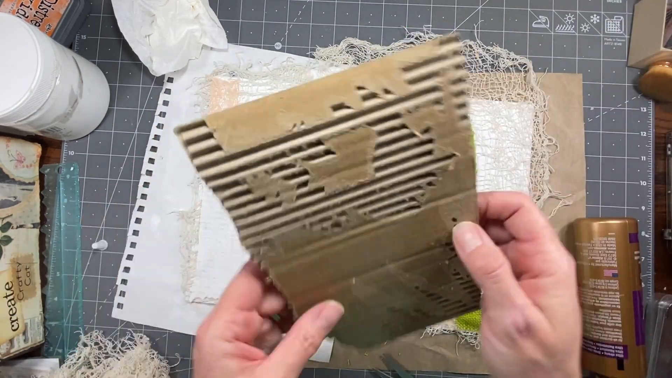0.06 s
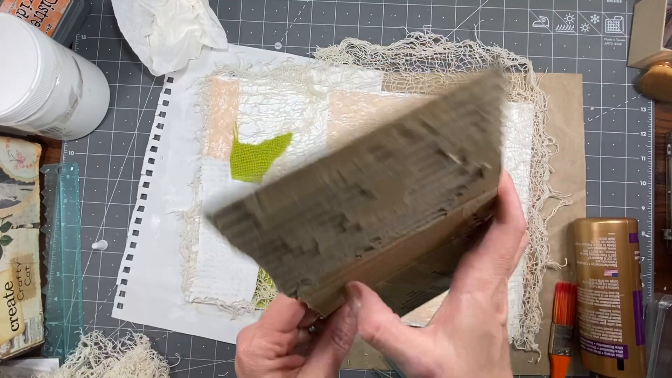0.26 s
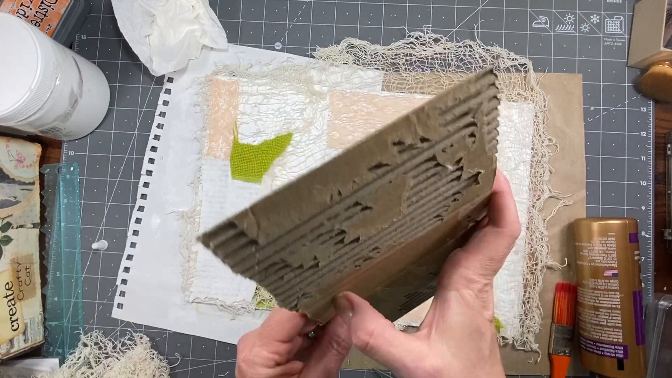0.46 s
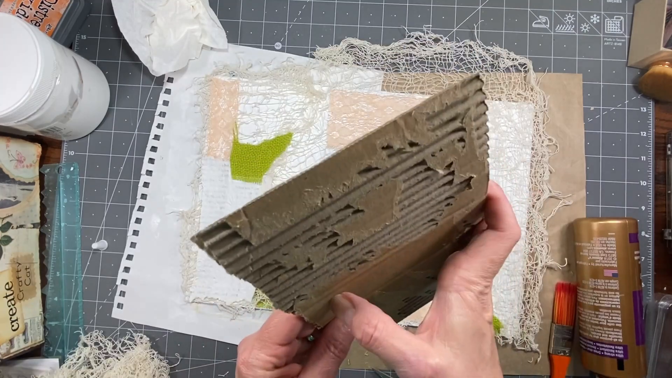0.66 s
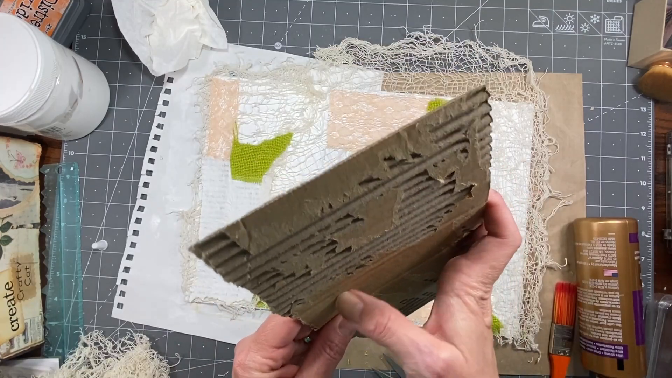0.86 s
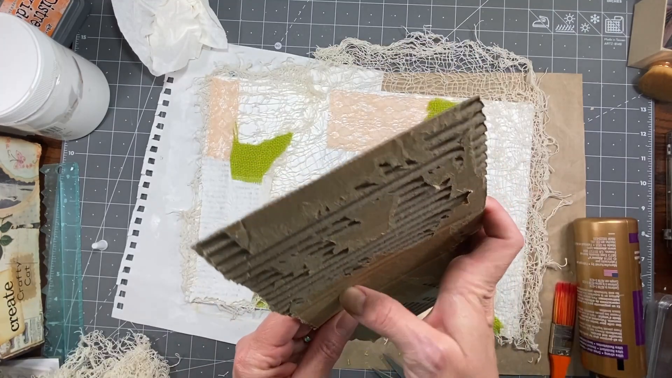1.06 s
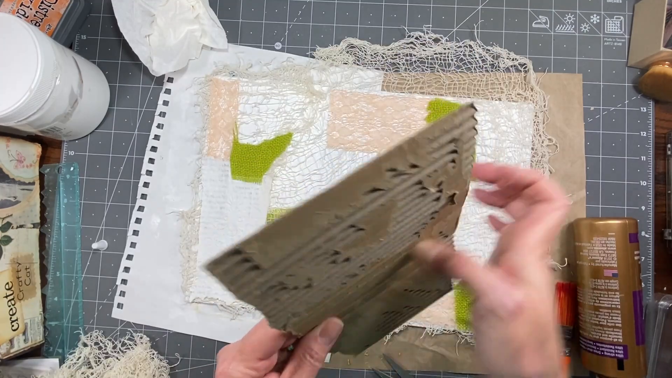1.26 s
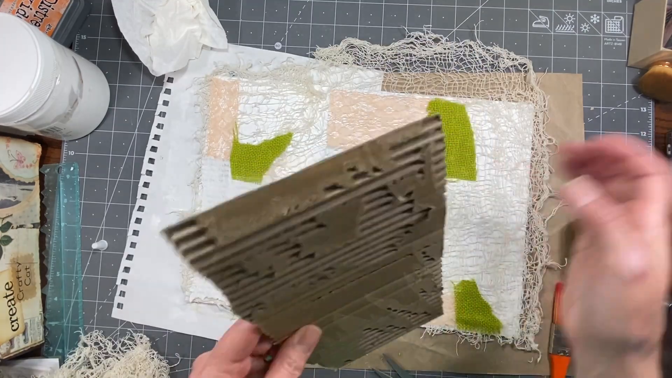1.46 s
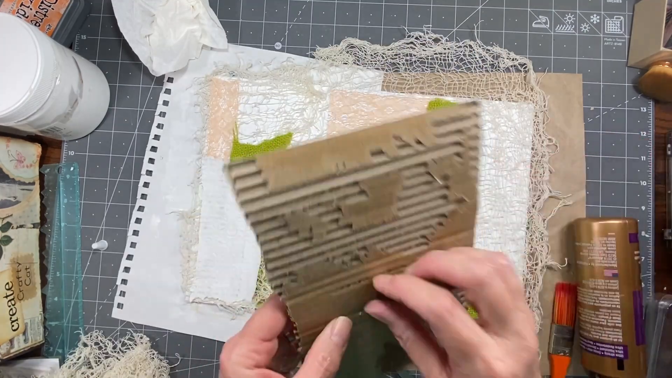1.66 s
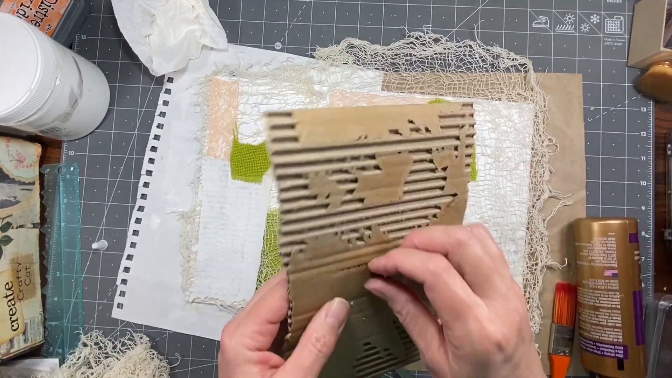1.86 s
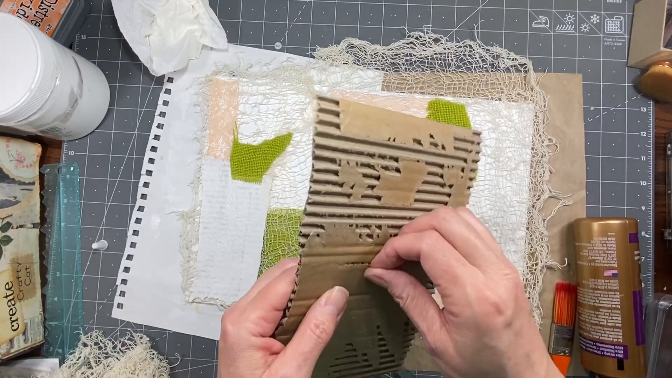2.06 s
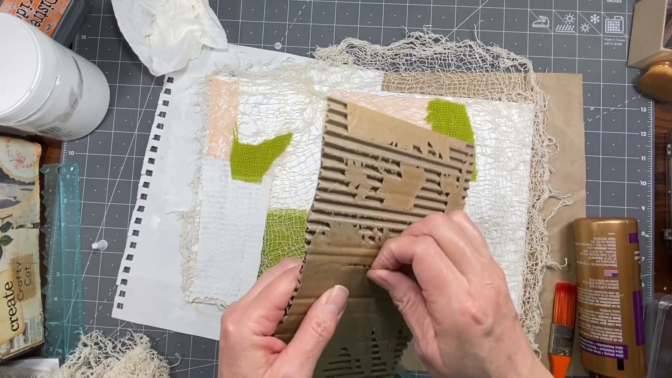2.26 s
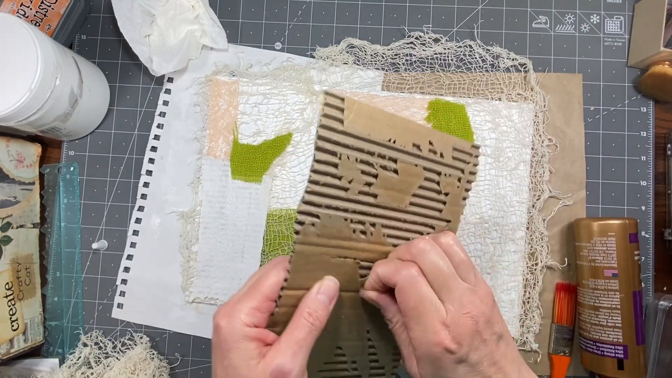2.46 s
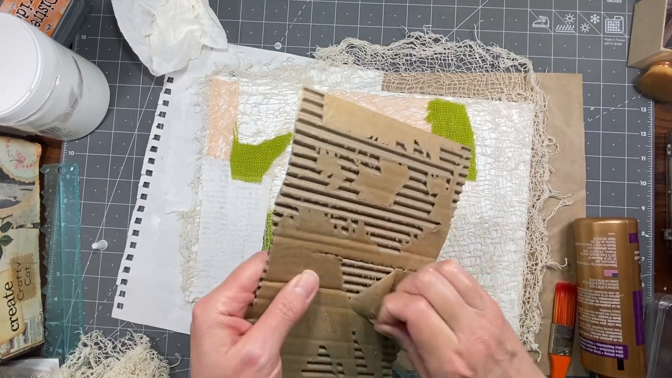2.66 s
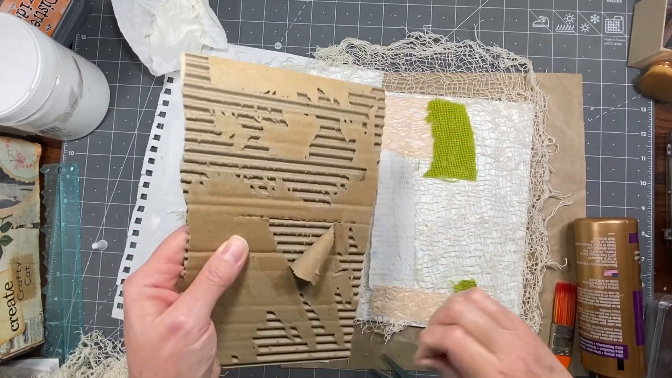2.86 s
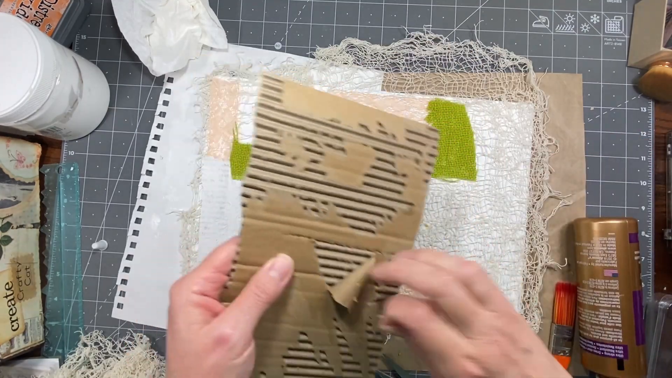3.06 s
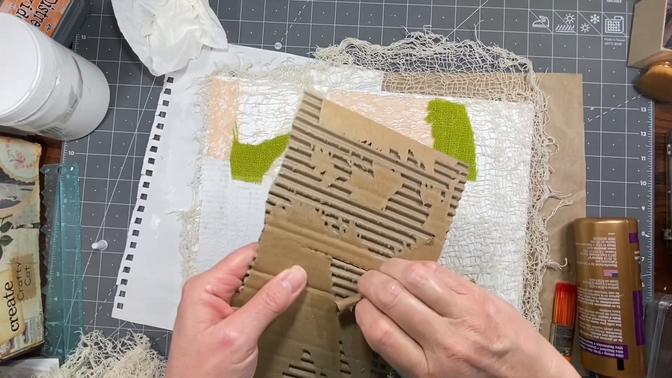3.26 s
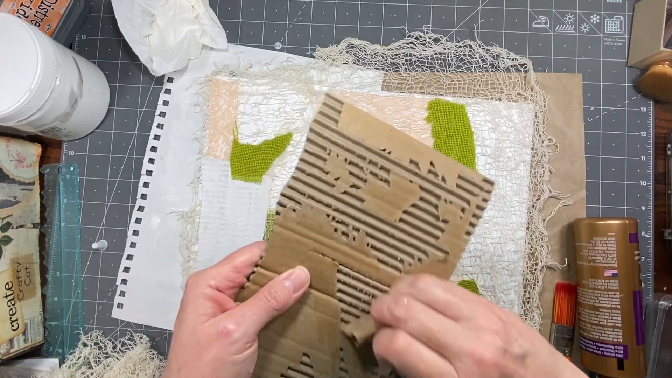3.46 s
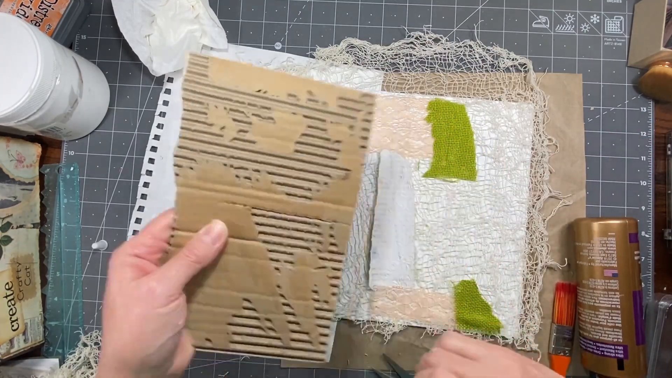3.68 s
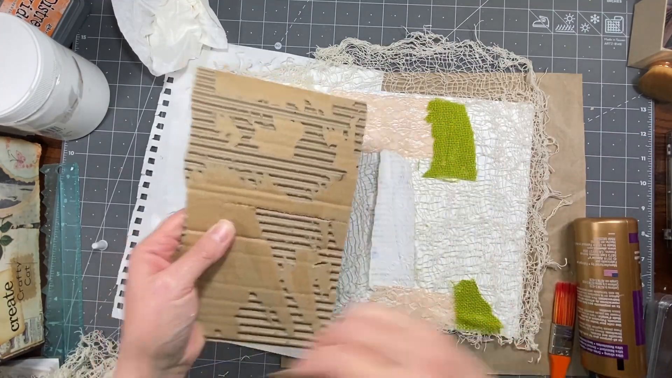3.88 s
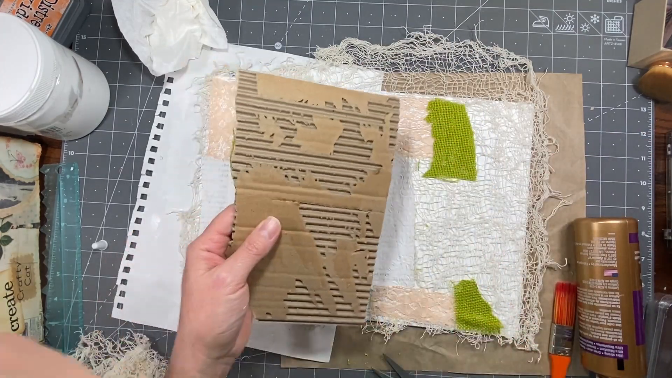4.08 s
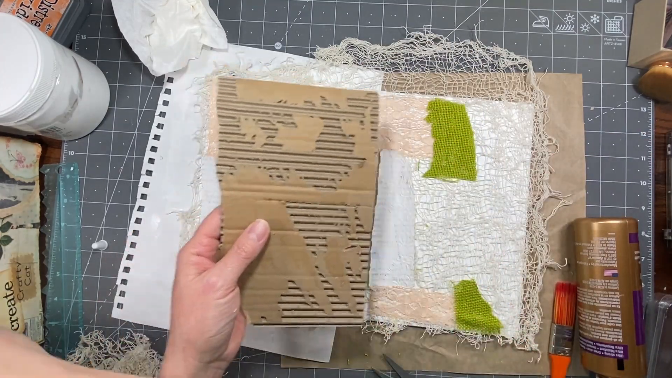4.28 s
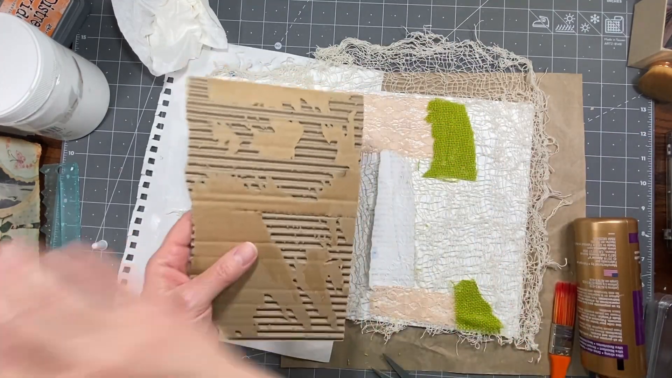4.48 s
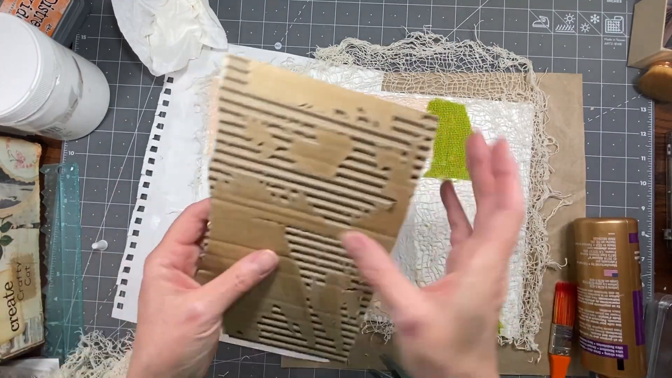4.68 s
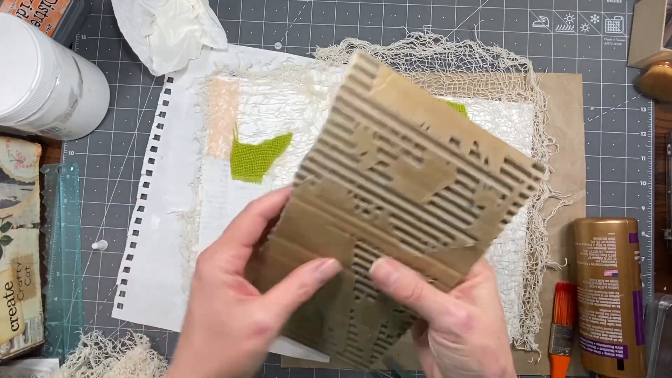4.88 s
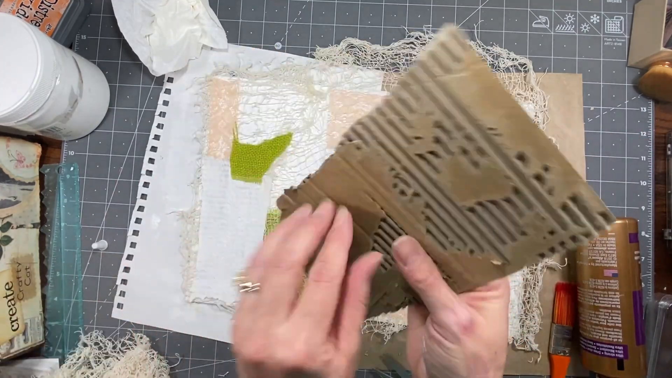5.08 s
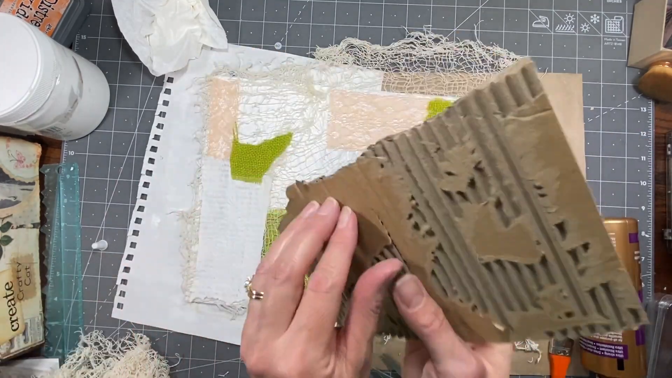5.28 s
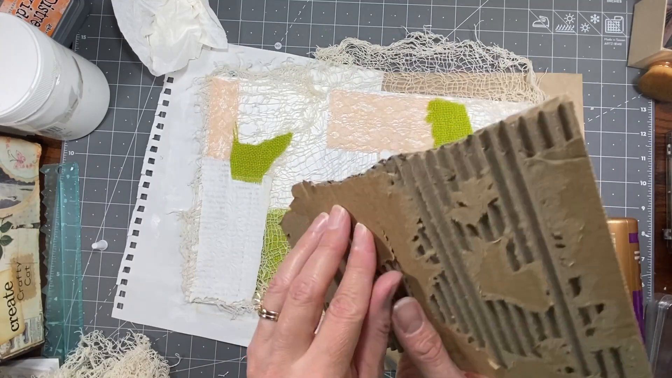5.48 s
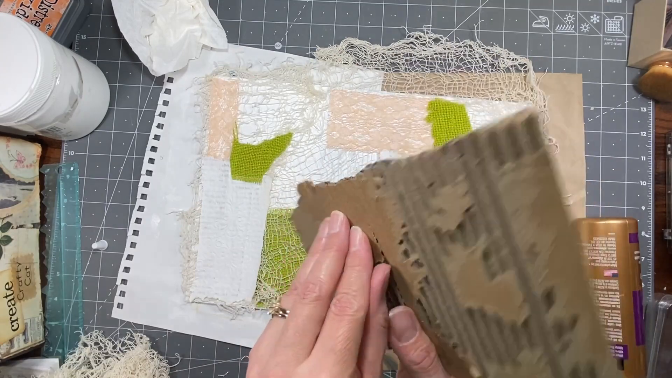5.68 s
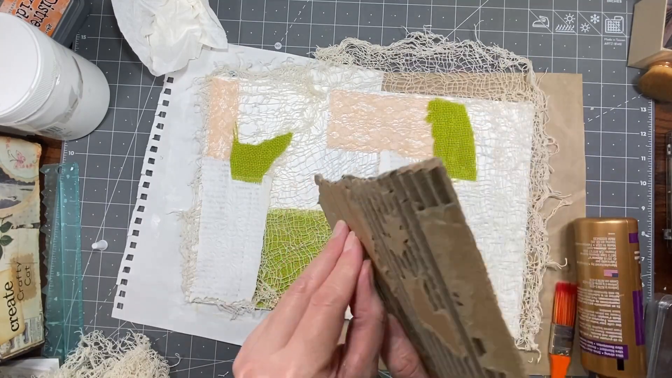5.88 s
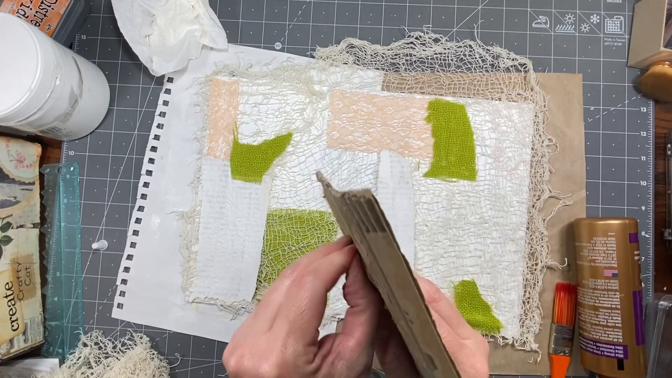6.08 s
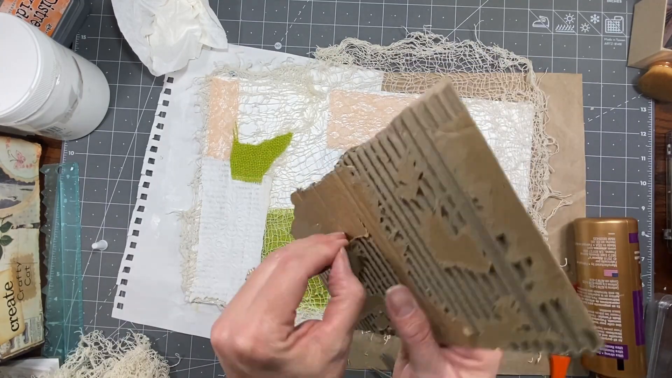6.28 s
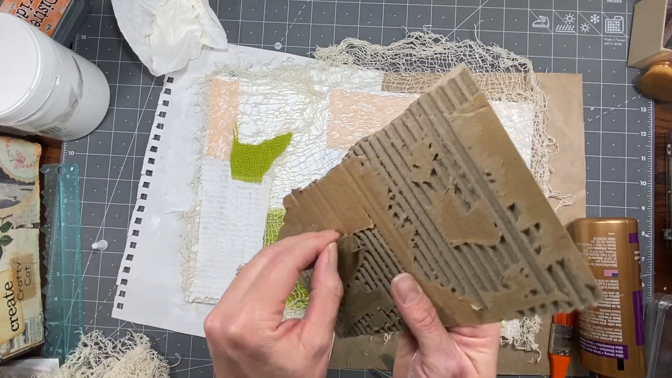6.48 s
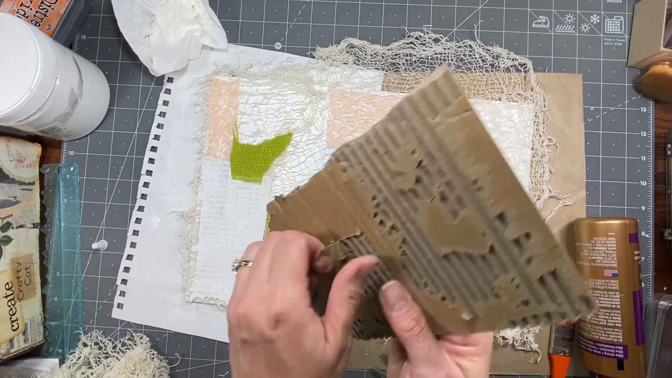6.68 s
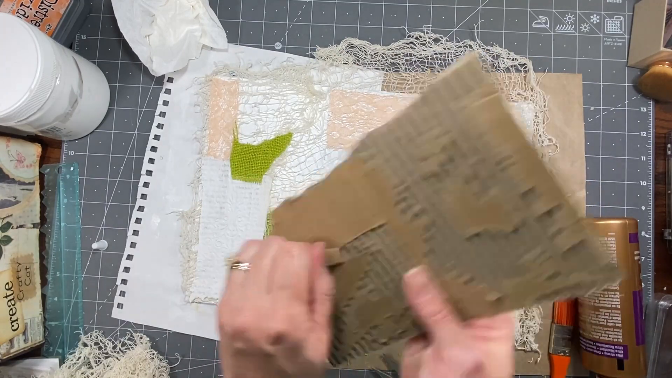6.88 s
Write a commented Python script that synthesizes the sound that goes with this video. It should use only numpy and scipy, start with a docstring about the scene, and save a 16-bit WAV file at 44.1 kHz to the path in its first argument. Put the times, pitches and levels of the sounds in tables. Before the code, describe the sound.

In a small, quiet room, fingers rub and scratch at corrugated cardboard, then tear its paper layer away in three short bouts of dry crackling and snapping. A softer stretch follows as the board is turned over, with light hollow taps and low bumps, before two more quick rips. The microphone is above the table and picks up a faint background and a very brief room reflection.

```python
"""A craft table in a small room: hands turn a piece of corrugated board over, pick at its paper facing
and peel it off in short rips. Fibres snap in dense clumps, crackle and shake the board; glue joints
crack. Fingertips knock on the hollow flutes; the held sheet trembles and thumps at grips and releases.
The room answers briefly. Heard from above through two microphone ports, over room tone."""
import sys
import numpy as np
from scipy import signal
from scipy.fft import rfft, irfft, next_fast_len
from scipy.io import wavfile
from scipy.ndimage import uniform_filter1d, map_coordinates

SR = 44100
rng = np.random.default_rng(int(sys.argv[2]) if len(sys.argv) > 2 else 0)


def pcm_store(signal):
    """Save signal as 16-bit PCM."""
    levels = np.round(np.clip(np.atleast_2d(signal), -1, 1) * 32767)
    wavfile.write(sys.argv[1], SR, levels.astype(np.int16).T)


N = 306054

# room tone spectrum: (frequency [Hz], density [dB])
ROOM_TONE = [(15, -42), (25, -5), (82, -6.5), (267, -22.5), (434, -16.5), (807, -34), (923, -26.5),
             (7140, -35), (7960, -34), (13300, -32.5), (15600, -38.5)]
# fingers rubbing and picking: (start [s], length [s], board level [dB], swell start to end [dB],
# crackle over board [dB], flex over board [dB], favoured pitch [Hz])
RUBS = [(0, 0.046, -70, -3, 4, -23, 1900), (0.06, 0.042, -50, -2, 6.5, -4.5, 1430),
        (0.128, 0.037, -67, -8, 3.5, -8, 1650), (0.181, 0.056, -46.5, 2.5, 2.5, -12.5, 2200),
        (0.258, 0.062, -52, 4.5, 3, -3.5, 1870), (0.335, 0.1, -58, 4, -4.5, -6.5, 1860),
        (0.457, 0.245, -69.5, -6.5, -13, -2, 1590), (0.562, 0.022, -68, -3, 3.5, 0, 1560),
        (.698, 0.029, -60, -7, 1.5, -4, 1080), (.735, 0.056, -75, -4, 0, -3, 1400),
        (0.827, 0.051, -63, 3, 9, 0, 2620), (0.942, 0.053, -60, -13.5, 9, 10, 1400),
        (1.016, 0.041, -69.5, -2, 12, 2.5, 1680), (1.489, 0.043, -75, 2, 12.5, -16.5, 1700),
        (1.54, 0.044, -65, -1, 9.5, -15, 1100), (1.617, 0.03, -45, -3.5, 2, -2, 960),
        (1.65, 0.11, -57, -12, 3, -3.5, 1390), (1.73, 0.14, -53, -13, 0, -13, 1590),
        (1.866, 0.035, -53, 0, 2.5, -12, 1540), (1.925, 0.068, -57.5, -12, 4.5, -13.5, 2670),
        (1.989, 0.16, -61, -10.5, 3.5, -13, 2620), (2.104, 0.092, -55, -16.5, -1, -14, 3130),
        (2.198, 0.05, -65, 8, 1, -12, 1250), (2.248, 0.13, -57.5, -7, 4.5, -13, 1210),
        (3.106, 0.067, -48, 2, -4, -11.5, 1860), (3.153, 0.078, -44, 2.5, 2, -13, 1860),
        (3.24, .045, -52, 3, -2, -9, 1840), (3.294, .02, -46.5, -1.5, 2, -7, 1860),
        (3.31, 0.036, -52.5, 0, -4.5, -8, 1860), (3.363, 0.048, -43.5, -6, 1.5, -13.5, 1860),
        (3.866, 0.037, -76.5, 5, 12.5, -8.5, 1200), (3.915, 0.083, -61.5, -1, 4, -3, 915),
        (3.977, 0.14, -59.5, -8.5, 3, -6, 1020), (4.142, .026, -70.5, -1.5, 22.5, -29, 2540),
        (4.187, .09, -73, -7, 6, -13, 1800), (4.28, 0.042, -64.5, -7, 5, -3, 1102),
        (4.36, 0.036, -65.5, -1, 4, -12, 1096), (4.426, 0.051, -66, 1, 4, -7, 2200),
        (4.494, 0.15, -59, -5.5, 3, -9.5, 1140), (4.661, 0.063, -75, -5, 5, -11.5, 1500),
        (4.741, 0.07, -67, 10.5, 2.5, -11, 2590), (4.79, 0.12, -56, -2.5, 3, -14, 1100),
        (4.876, 0.041, -44.5, 3, 3, -9, 1520), (4.918, .076, -53, 5, 2.5, -12, 1510),
        (5.004, 0.091, -63.5, -9, -1, -4, 1860), (5.113, .145, -58.5, -0.5, 6.5, -10, 1170),
        (5.254, 0.027, -46, -5, -2, -14, 1520), (5.298, 0.038, -43.5, -8, -8, -9.5, 1840),
        (5.342, 0.046, -55, 12, 1.5, -12, 1110), (5.388, 0.038, -48.5, -4, -0.5, -14, 3100),
        (5.453, 0.15, -64, -21.5, 1, -14.5, 2230), (5.581, 0.069, -53, 3.5, 3.5, -26, 2380),
        (5.679, 0.079, -54, -2, 3.5, -11.5, 2700), (5.77, 0.09, -57, 8, 2, -14, 2220),
        (5.871, 0.063, -54, -11, -0.5, -12, 785), (5.93, 0.059, -45.5, -1, 2, -18.5, 1960),
        (6.001, 0.1, -53.5, 6, 10.5, -32, 800), (6.12, 0.053, -57.5, 14, 11.5, -30, 2580),
        (6.187, .11, -43, 0.5, 7.5, -17, 2210), (6.402, 0.066, -66.5, 8, -1, -12, 1100),
        (6.457, .092, -54, 1, -5.5, -7, 1730), (6.695, .045, -58.5, 3, 5.5, -13.5, 1600),
        (6.743, 0.048, -43.5, -3, 1.5, -10.5, 1900)]
# facing tearing off, one list a rip:
# (time [s], board level [dB], crackle over board [dB], flex over board [dB], favoured pitch [Hz])
RIPS = [
    [(1.088, -40.5, 6.5, -9.5, 2220), (1.148, -38, 2, -2.5, 1470), (1.212, -26.5, 4, -12.5, 1202),
     (1.266, -26, 2.5, -13, 1153), (1.28, -18.5, 9, -16, 1340), (1.3, -38.5, 2.5, 4.5, 1320)],
    [(2.357, -45.5, 10.5, -6, 3020), (2.38, -34, 4.5, -14.5, 2840), (2.428, -45.5, 14.5, -3, 2020),
     (2.46, -48, 14.5, -14, 2770), (2.52, -47, 4.5, -15, 2580)],
    [(2.53, -33.5, 6.5, -18, 2700), (2.582, -36.5, 8, -11, 1550), (2.632, -39, 6, -10, 2900),
     (2.668, -40.5, 12.5, -11, 1380), (2.698, -35.5, 8.5, -20, 1390), (2.702, -16, -17.5, -20, 1260),
     (2.712, -24.5, -4.5, -16, 1400), (2.722, -45, -8.5, -4, 1470)],
    [(3.413, -32, 3, -10, 1810), (3.443, -27.5, 4.5, -14, 1990), (3.505, -32, 7.5, -7, 2200),
     (3.567, -24.5, 6.5, -8, 1600), (3.597, -40, 5.5, -9.5, 1763), (3.63, -41.5, 9.5, -6, 1240)],
    [(6.31, -37.5, 1.5, -12, 2070), (6.346, -33, 8.5, -11, 1880), (6.39, -50, 3.5, -10, 1880)],
    [(6.815, -49, 5, -15, 1900), (6.84, -39, 4.5, -14, 1860), (6.863, -27.5, 5.5, -15.5, 2120),
     (6.923, -28, 2, -8.5, 1630), (6.94, -49.5, 8, -4, 1800)],
]
# glue joints letting go: (time [s], board level [dB], crackle over board [dB], flex over board [dB])
GLUE_SNAPS = [(0.0539, -34.5, 18.5, -5), (.0998, -25, -16, -3), (0.2215, -23.5, -5, -7),
              (.2813, -35, 14, -3), (0.7008, -43, 4, -12), (0.951, -9, 7, -5), (.968, -31.5, 12, -14),
              (1.0854, -18, 4.5, -1.5), (1.246, -6.5, 1, -14), (1.2763, -6, -2, -5),
              (1.6146, -32, -2.5, 7.5), (1.6272, -21.5, 2.5, -9), (1.6404, -12.5, -24, -6),
              (1.728, -31.5, -14, 2), (1.9275, -43, 7, -25), (2.03, -31.5, 3.5, -25), (2.1077, -50, 6, -15),
              (2.2503, -34, 13, -32), (2.355, -15, -5, -8.5), (2.3753, -12.5, 2, -34),
              (2.4049, -19, 15, -14), (2.528, -19.5, -2, -6.5), (2.6799, -14.5, -2, -2.5),
              (2.7005, -6, -20, -2), (2.71, -19, 4.5, -20), (3.1053, -29.5, -15, 5),
              (3.129, -24.5, -6.5, -18), (3.2223, -36, 4, 7), (3.299, -24, 1, -11), (3.3397, -20, -22, -7),
              (3.3588, -34, 8, -19), (3.403, -14, -12, -19), (3.4136, -23, 9, -19), (3.4548, -9, 0, -17),
              (3.6197, -16.5, -5, -3), (3.9717, -30, -3, 1.5), (4.2795, -38.5, -1.5, -17),
              (4.4315, -51, 13, -13), (4.4992, -45.5, 5.5, 7), (4.8944, -20.5, -11.5, 1),
              (4.912, -37, -2, -13), (5.0414, -37, 3, -15), (5.1077, -24, -1.5, 1.5),
              (5.2556, -30, -16, -3), (5.3005, -26, -22, -12), (5.3288, -31, -10, -10),
              (5.6095, -38.5, 18, -29), (5.9303, -42, 1, -14), (6.0912, -31, 17, -32),
              (6.186, -13.5, -16, -43), (6.2074, -22, 13.5, -26), (6.223, -26.5, 21.5, -32),
              (6.24, -13, 10.5, -25), (6.2567, -23, 2, -14), (6.31, -22, 9, -16), (6.467, -36, 0, -20),
              (6.5301, -27.5, -14, -9), (6.5927, -43, 10, -28), (6.746, -24, -1, -13),
              (6.77, -11.5, -10, -18), (6.8145, -23.5, 8, -23), (6.8484, -13, -1, -27),
              (6.8756, -9, 7.5, -18.5)]
# fingertips on the flutes: (time [s], level [dB], pitch [Hz])
KNOCKS = [(.059, -35, 187), (.21, -36, 220), (.236, -33.5, 391), (.952, -34.5, 393), (.957, -32, 209),
          (1.293, -17, 375), (1.299, -27.5, 188), (1.638, -28.5, 370), (2.714, -47.5, 413),
          (3.104, -39, 448), (3.224, -33.5, 420), (3.618, -32.5, 424), (3.974, -47, 339),
          (4.892, -33.5, 163), (5.107, -30.5, 213), (5.3, -47, 323), (5.697, -52.5, 200),
          (6.69, -38.5, 292), (6.768, -38.5, 399)]
# grips and releases: (time [s], level [dB], pitch [Hz])
THUMPS = [(.068, -37, 69.4), (.105, -37, 78), (.242, -41, 89.9), (.299, -50, 74), (.954, -41.5, 97.2),
          (1.136, -61, 101.5), (1.207, -41.5, 104.6), (1.296, -34.5, 68.7), (1.651, -34.5, 79.7),
          (1.759, -51, 67.9), (2.405, -54.5, 72.3), (2.578, -48, 75), (2.706, -40, 80.6),
          (3.117, -42, 77.3), (3.465, -69.5, 54), (3.527, -52, 94), (3.58, -48.5, 73), (4.913, -34.5, 65.8),
          (5.12, -40, 66.3), (5.321, -46, 70.3), (5.692, -58.5, 88), (6.241, -48, 60), (6.352, -53.5, 88.4),
          (6.526, -58.5, 70.6), (6.696, -46, 89.6), (6.869, -41, 86)]
# resonances of board ringing, board flexing, whole sheet flapping: (frequency [Hz], width [Hz], gain [dB])
BOARD_MODES = [(783, 100, -5), (975, 120, 0.5), (1117, 130, -5.5), (1476, 300, -2.5), (1870, 212, -2.5),
               (2323, 440, -2), (2583, 110, -4.5), (2910, 500, 2), (4000, 3600, 4.5)]
FLEX_MODES = [(165, 20, -6), (261, 58, -4), (407, 48, 3), (590, 120, -1)]
SHEET_MODES = [(70, 44, 0)]
# fibre crackle spectrum: (frequency [Hz], density [dB])
CRACKLE_SPECTRUM = [(2500, -18.5), (4500, -6.5), (5500, -4.5), (7500, -0.5), (11000, -4.5), (13500, -1.5),
                    (15600, -7.5)]
# room decay: (frequency [Hz], T60 [s])
ROOM_DECAY = [(150, 0.1), (1500, 0.24), (6000, 0.25), (15000, 0.2)]
# between the ports: (frequency [Hz], left lead [rad], likeness [0-1], left over right [dB])
PORTS = [(60, .1, .98, 0), (150, 0, .95, 1.5), (350, -.3, .8, 4), (600, -.8, .7, 3.5), (1100, -.8, .65, 0),
         (1800, 0, .95, -1), (2600, .6, .5, -4), (3800, .3, .7, -2.5), (4700, .7, .45, -2.5),
         (5900, 1.3, .6, -.5), (6800, 2.9, .97, 0), (7800, 3.4, .97, 0), (8700, 4.5, .65, 0),
         (9800, 6.15, .99, 0), (10900, 6.4, .99, 0), (11900, 7.5, .5, 0), (12800, 9.3, .99, 0),
         (14300, 9.55, .99, 0), (15000, 10.8, .5, 0), (15800, 12.4, .8, 0)]
# microphone response: (frequency [Hz], gain [dB])
MIC_RESPONSE = [(25, -8), (50, 0), (15750, 0), (15950, -36)]

STROKE_ATTACK_DB_PER_S, STROKE_RELEASE_DB_PER_S = 2199.5, 899.5
BURST_DB, BURST_T60_S, BURST_RISE_S = -11.5, 0.019, 0.00046
ROOM_TONE_DB, REVERB_DB = -73, -20.0
BAND_LIMIT_HZ = 17140


def amp(db):
    """Level to gain."""
    return 10 ** (np.asarray(db) / 20)


def unit_rms(x):
    """x at rms 1."""
    return x / np.sqrt(np.mean(x ** 2) + 1e-20)


def lookup(table, hz, column=1):
    """Table column interpolated over log frequency."""
    points = np.array(table, float)
    return np.interp(np.log(hz + 1), np.log(points[:, 0] + 1), points[:, column])


def wobble(knots_per_s):
    """Smooth random curve."""
    knots = rng.standard_normal(int(N * knots_per_s / SR) + 4)
    return map_coordinates(knots, [np.arange(N) * knots_per_s / SR])


def filtered(x, response):
    """x through a complex frequency response."""
    size = next_fast_len(N + SR // 2)
    return irfft(rfft(x, size) * response(np.fft.rfftfreq(size, 1 / SR)), size)[..., :N]


def drive(force, response):
    """Force through a response scaled so white noise keeps its rms."""
    hz = np.linspace(0, SR / 2, 4096)
    return filtered(force, response) / np.sqrt(np.mean(np.abs(response(hz)) ** 2))


def modes(table):
    """Causal response of resonances, alternating in sign."""
    return lambda hz: sum((-1) ** k * amp(db) * 1j * hz * width / (centre**2 - hz**2 + 1j * hz * width)
                          for k, (centre, width, db) in enumerate(table))


def room_tone():
    """Unsteady background: bass common to both ports, the rest unrelated."""
    noise = filtered(rng.standard_normal((3, N)), lambda hz: amp(lookup(ROOM_TONE, hz)))
    bass_share = lambda hz: 1 / (1 + (hz / 180) ** 4)
    common = filtered(noise[0], lambda hz: np.sqrt(bass_share(hz)))
    separate = filtered(noise[1:], lambda hz: np.sqrt(1 - bass_share(hz)))
    return amp(ROOM_TONE_DB + 2.1 * wobble(27.0)) * unit_rms(common + separate)


def hand_strokes():
    """Rubs and rips: strength on (board, crackle, flex) and power-weighted favoured pitch."""
    rubs = [[(start_s, db - swell_db / 2, *colour), (start_s + length_s, db + swell_db / 2, *colour)]
            for start_s, length_s, db, swell_db, *colour in RUBS]
    t, centre_hz = np.arange(N) / SR, 1600
    power, weighted_octaves = np.full((3, N), 1e-10), np.zeros(N)
    for stroke in rubs + RIPS:
        times_s, board_db, crackle_db, flex_db, hz = np.transpose(stroke)
        edge_db = STROKE_ATTACK_DB_PER_S * np.minimum(t - times_s[0], 0)
        edge_db += STROKE_RELEASE_DB_PER_S * np.minimum(times_s[-1] - t, 0)
        active = edge_db > -70
        levels_db = board_db, board_db + crackle_db, board_db + flex_db
        stroke_power = amp([np.interp(t[active], times_s, db) + edge_db[active] for db in levels_db]) ** 2
        power[:, active] += stroke_power
        weighted_octaves[active] += stroke_power[0] * np.interp(t[active], times_s, np.log2(hz / centre_hz))
    return np.sqrt(power), np.log2(centre_hz) + weighted_octaves / power[0]


def fibres(per_s, spread_db, clump_db):
    """Fibres breaking in clumps, random in time and size; rms 1."""
    breaks = rng.random(N) < per_s / SR
    size = amp(spread_db * rng.exponential(size=N)) * rng.standard_normal(N)
    clumps = amp(clump_db * (wobble(45) + 0.37 * wobble(170)))
    return unit_rms(breaks * size * clumps)


def cardboard(forces, strength, favoured_log2_hz):
    """Board rings, flexes, crackles; the shifting grip damps modes away from the favoured pitch."""
    board_force, crackle_force, flex_force = forces
    brightness_db = np.clip(20 * np.log10(strength[1] / strength[0]), -15, 15)
    boost_db = 11 - 0.44 * brightness_db  # dull strokes ring more
    nearness = lambda hz: np.exp(-((np.log2(hz) - favoured_log2_hz) / 0.21) ** 2)
    gains = [amp(db + boost_db * nearness(hz) + 2.3 * wobble(12)) for hz, _, db in BOARD_MODES]
    shares = gains / np.sqrt(np.sum(np.square(gains), axis=0))
    sides = np.sign(rng.standard_normal(shares.shape))  # each fibre's side of a mode's node lines
    ringing = sum(share * drive(side * board_force, modes([(hz, width_hz, 0)]))
                  for side, share, (hz, width_hz, _) in zip(sides, shares, BOARD_MODES))
    flexing = drive(flex_force, modes(FLEX_MODES))
    crackle = drive(crackle_force, lambda hz: amp(lookup(CRACKLE_SPECTRUM, hz)))
    bending_delay = lambda hz: np.exp(-2j * np.pi * 0.2042 * (np.sqrt(hz) - hz / 150))  # lows come late
    return filtered(ringing + flexing, bending_delay) + crackle


def sheet_rumble(flex_strength):
    """The held sheet trembles, more as the hands work harder."""
    effort = uniform_filter1d(flex_strength, size=1500)
    level = effort ** 0.44 * amp(-38.5 + 3.1 * wobble(10))
    return drive(level * rng.standard_normal(N), lambda hz: modes(SHEET_MODES)(hz) ** 2)


def glue_snaps():
    """Each joint cracks once, then a dying fibre burst: force on (board, crackle, flex)."""
    bursts, cracks = np.zeros((3, N + SR)), np.zeros((3, N))
    t = np.arange(SR // 5) / SR
    envelope = amp(BURST_DB - 60 * t / BURST_T60_S) * (1 - np.exp(-t / BURST_RISE_S))
    for time_s, db, crackle_db, flex_db in GLUE_SNAPS:
        start = round(time_s * SR)
        gains = amp([db, db + crackle_db, db + flex_db])
        cracks[:, start] = gains
        bursts[:, start:start + len(t)] += np.outer(gains, envelope)
    return cracks + bursts[:, :N] * fibres(per_s=19000, spread_db=2.5, clump_db=-0.6)


def soft_blows(table, t60_s, rise_s, sag, lift_db):
    """Knock or thump: a few cycles, pitch sagging as the bend spreads."""
    blows, t = np.zeros(N + SR), np.arange(SR // 2) / SR
    settling = np.exp(-t / rise_s)
    envelope = amp(lift_db - 60 * t / t60_s) * (1 - settling)
    for time_s, db, hz in table:
        phase = 2 * np.pi * np.cumsum(hz * (1 + sag * settling)) / SR
        blows[round(time_s * SR):][:len(t)] += amp(db) * envelope * np.sin(phase)
    return blows[:N]


def reverb(x):
    """Walls answer about 6 ms late; each band dies at its own rate."""
    hz, t, bands = signal.stft(rng.standard_normal(SR // 2), SR, nperseg=128)
    decay = amp(-60 * t / lookup(ROOM_DECAY, hz)[:, None])
    tail = signal.istft(bands * decay, SR, nperseg=128)[1]
    return signal.fftconvolve(np.pad(x, (250, 0)), tail / np.linalg.norm(tail))[:N]


def scatter(x):
    """Moving hands and the table shift each band's phase at random."""
    bands = signal.stft(x, nperseg=128)[2]
    drift = uniform_filter1d(rng.standard_normal(bands.shape), size=3, axis=0)
    drift = uniform_filter1d(drift, size=16, axis=1)
    return signal.istft(bands * np.exp(2j * unit_rms(drift)), nperseg=128)[1][:N]


def mic_ports(x):
    """Two ports, apart in phase and level; the scattered part arrives in opposite polarity."""
    mix_rad = lambda hz: np.arccos(np.clip(lookup(PORTS, hz, column=2), 0, 1)) / 2
    left_gain = lambda hz: np.exp(.5j * lookup(PORTS, hz)) * amp(lookup(PORTS, hz, column=3) / 2)
    direct = filtered(x, lambda hz: np.cos(mix_rad(hz)))
    scattered = filtered(scatter(x), lambda hz: np.sin(mix_rad(hz)))
    pair = np.array([direct + scattered, direct - scattered])
    return filtered(pair, lambda hz: [left_gain(hz), 1 / left_gain(hz)])


def scene():
    """Board and knocks with reverb, sheet dry, through the ports, over room tone."""
    strength, favoured_log2_hz = hand_strokes()
    peel = strength * fibres(per_s=10000, spread_db=1.2, clump_db=1.62)
    board = cardboard(peel + glue_snaps(), strength, favoured_log2_hz)
    knocks = soft_blows(KNOCKS, t60_s=0.045, rise_s=0.0025, sag=0.11, lift_db=2.5)
    thumps = soft_blows(THUMPS, t60_s=0.15, rise_s=0.013, sag=0.085, lift_db=10)
    handling = board + knocks
    sheet = thumps + sheet_rumble(strength[2])
    return mic_ports(handling + amp(REVERB_DB) * reverb(handling) + sheet) + room_tone()


def record(dry):
    """The loudest peaks are rounded off; then microphone colour and band limit."""
    rounded = dry / (1 + np.abs(dry / .6) ** 3) ** (1 / 3)
    return filtered(rounded, lambda hz: amp(lookup(MIC_RESPONSE, hz)) * (hz < BAND_LIMIT_HZ))


dry = scene()
out = record(dry)
pcm_store(out)
```